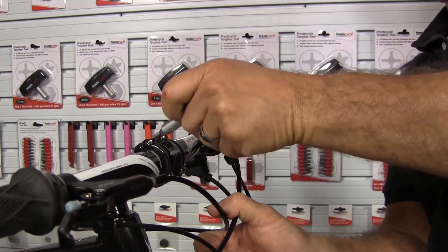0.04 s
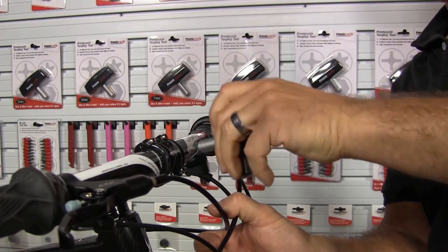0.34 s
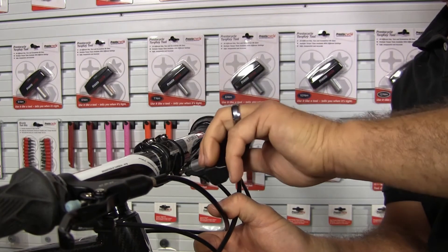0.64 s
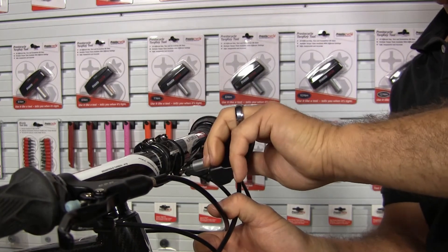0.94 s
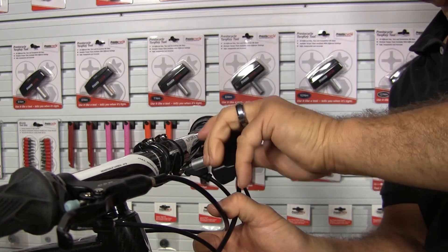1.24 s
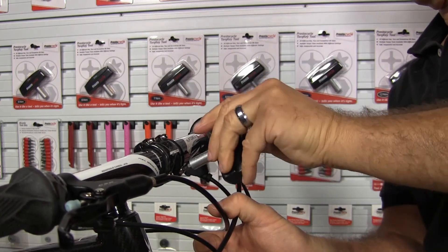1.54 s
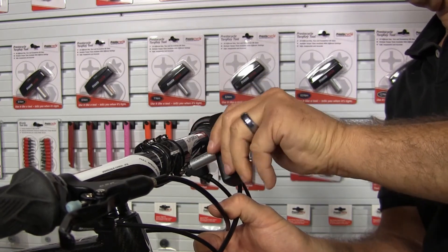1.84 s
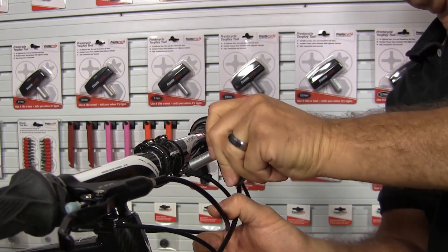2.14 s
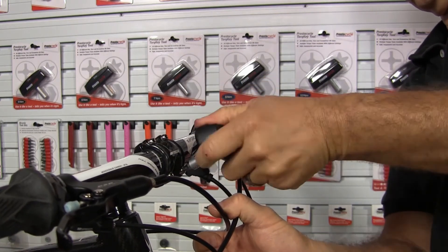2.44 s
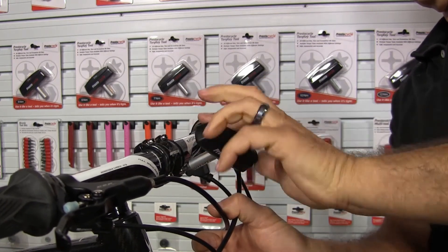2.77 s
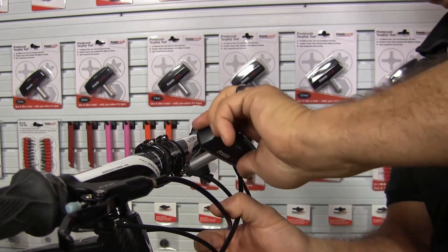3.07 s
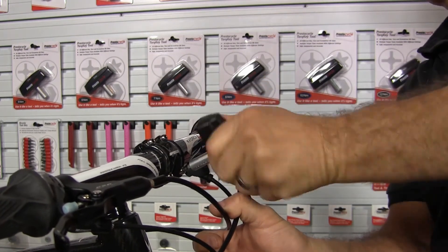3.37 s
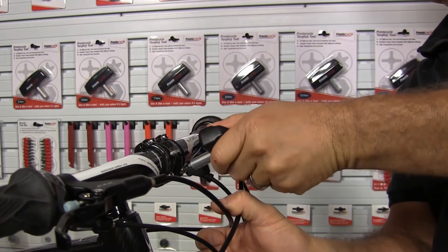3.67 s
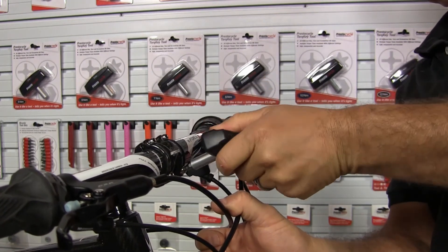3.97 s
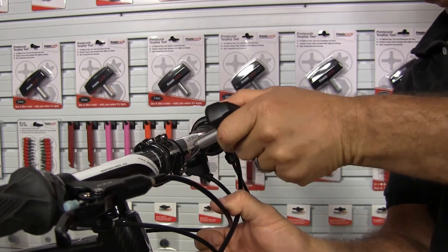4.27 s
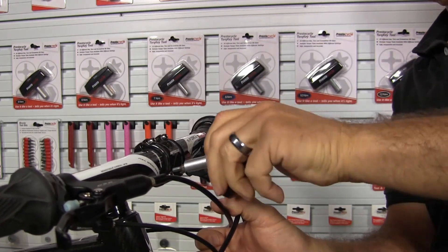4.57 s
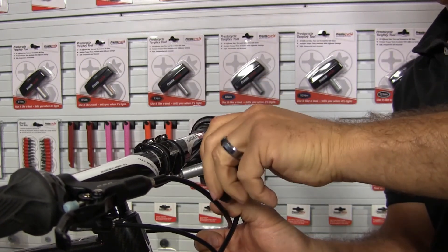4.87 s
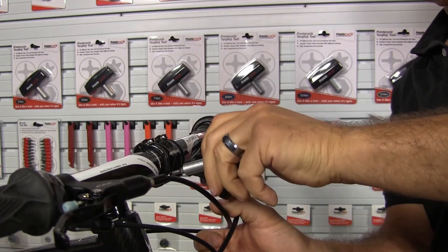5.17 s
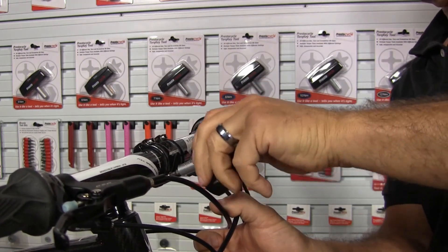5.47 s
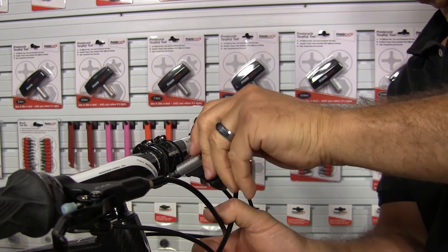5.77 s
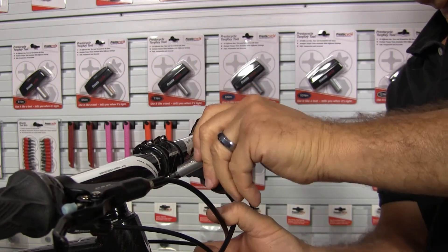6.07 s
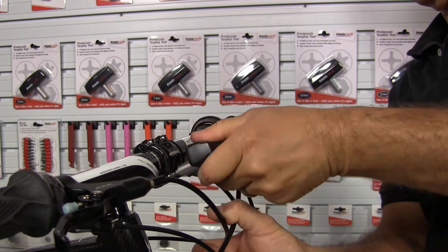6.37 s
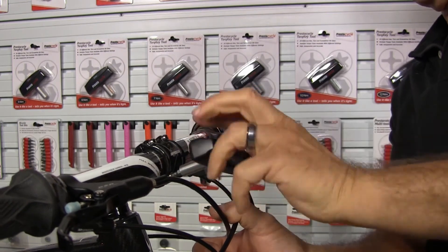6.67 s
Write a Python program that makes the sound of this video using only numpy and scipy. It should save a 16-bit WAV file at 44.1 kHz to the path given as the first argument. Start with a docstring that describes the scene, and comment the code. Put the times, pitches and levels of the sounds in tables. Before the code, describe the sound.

Close, irregular metallic clicks and knocks sound in a quiet little workshop as screws on a bicycle handlebar are undone. The steel bit scrapes into a screw head, and two screws let go with short ringing snaps, the second the loudest. Softer ticks and a faint rub of skin on plastic follow, then clusters of bright clicks and several lighter knocks. A soft hiss and low rumble lie underneath.

```python
"""Screws on a bicycle handlebar let go under a small T-handle torque tool, each snap ringing the bar.
The steel bit clicks and scrapes in the screw heads; the hand rubs over the handle and the grip
squeaks faintly. A small, quiet workshop answers with a short tail over low rumble and steady hiss."""
import sys
import numpy as np
from scipy import signal
from scipy.fft import rfft, irfft, next_fast_len
from scipy.io import wavfile
from scipy.ndimage import uniform_filter1d

SR = 44100
rng = np.random.default_rng(int(sys.argv[2]) if len(sys.argv) > 2 else 0)


def wav_out(sig):
    """Save sig, one row per channel (or a flat mono array), as 16-bit PCM at SR to the path in sys.argv[1]."""
    wavfile.write(sys.argv[1], SR, np.round(np.clip(np.atleast_2d(sig).T, -1, 1) * 32767).astype(np.int16))


N = 300762


def amp(db):
    """Decibels to gain."""
    return 10 ** (np.asarray(db) / 20)


def unit(x):
    """Scale to rms 1."""
    return x / np.sqrt(np.mean(x ** 2) + 1e-20)


def along(points, hz):
    """Interpolate (freq_hz, value) points on a log axis."""
    freqs_hz, values = np.transpose(points)
    return np.interp(np.log(hz + 1), np.log(freqs_hz + 1), values)


def filtered(x, response):
    """Apply a frequency response."""
    n = x.shape[-1]
    size = next_fast_len(n + SR // 4)
    return irfft(rfft(x, size) * response(np.fft.rfftfreq(size, 1 / SR)), size)[..., :n]


def convolved(x, response):
    """Apply an impulse response, keeping the length of x."""
    return signal.fftconvolve(np.atleast_2d(x), np.atleast_2d(response), axes=1)[:, :x.shape[-1]]


def coloured(x, points, size=4096):
    """Minimum-phase filter from (freq_hz, gain_db) points; attacks stay sharp."""
    cepstrum = irfft(np.log(amp(along(points, np.fft.rfftfreq(size, 1 / SR)))))
    cepstrum[1:size // 2] *= 2
    cepstrum[size // 2 + 1:] = 0
    return convolved(x, irfft(np.exp(rfft(cepstrum))))


def add(track, start_s, sound):
    """Mix a stereo sound into the track."""
    part = track[:, round(start_s * SR):][:, :sound.shape[1]]
    part += sound[:, :part.shape[1]]


def held(start_s, end_s, attack_s, release_s):
    """Envelope: 1 from start_s to end_s, exponential flanks outside."""
    t = np.arange(N) / SR
    return np.exp(np.minimum(t - start_s, 0) / attack_s - np.maximum(t - end_s, 0) / release_s)


def wander(rate_hz):
    """Random drift of rms 1: noise averaged over 1 / rate_hz."""
    return unit(uniform_filter1d(rng.standard_normal(N), SR // rate_hz))


def noise_pair(correlation, size):
    """Stereo white noise; correlation is a function of frequency."""
    mid, side = rng.standard_normal((2, size))
    side = filtered(side, lambda hz: np.sqrt((1 - np.clip(correlation(hz), 0, 1)) / 2))
    mid = filtered(mid, lambda hz: np.sqrt((1 + np.clip(correlation(hz), 0, 1)) / 2))
    return np.array([mid + side, mid - side])


def echoes(decay, correlation, rise_s):
    """Dense stereo echoes, energy 1 per channel; decay lists (freq_hz, t60_s)."""
    hz, t, spectra = signal.stft(noise_pair(lambda hz: correlation, SR // 2), SR, nperseg=128)
    spectra = spectra * amp(-60 * t / along(decay, hz)[:, None])
    tail = signal.istft(spectra, SR, nperseg=128)[1][:, :SR // 2]
    tail *= 1 - np.exp(-(np.arange(tail.shape[1]) / SR / rise_s) ** 2)
    return tail / np.sqrt(np.sum(tail ** 2) / 2)


# background spectrum: freq_hz, gain_db
AIR_SPECTRUM = [(12, -20), (20, -2), (55, -5), (137, -7.5), (186, -10.5), (268, -12), (385, -14.5),
                (455, -14), (618, -16), (1550, -20.5), (1990, -20.5), (2290, -21), (3290, -21.5),
                (15700, -26)]
# background left-right likeness: freq_hz, correlation
AIR_CORRELATION = [(30, 0.85), (250, 0.58), (1000, 0.24), (4000, 0.067), (12000, 0.03)]


def workshop_air(level_db=-59):
    """Low building rumble and even hiss."""
    noise = noise_pair(lambda hz: along(AIR_CORRELATION, hz), N)
    return amp(level_db) * unit(filtered(noise, lambda hz: amp(along(AIR_SPECTRUM, hz))))


# room reverberation: freq_hz, t60_s
ROOM_DECAY = [(200, 0.82), (800, 0.31), (1500, 0.37), (2700, 0.29), (5000, 0.27), (9000, 0.33),
              (14000, 0.083)]


def in_room(x, room_db):
    """Direct sound plus the room's tail."""
    tail = echoes(ROOM_DECAY, correlation=0.77, rise_s=0.004)
    return x + amp(room_db) * convolved(np.atleast_2d(x).mean(axis=0), tail)


# squeaks of the shifting grip: start_s, length_s, first_hz, last_hz, level_db
GRIP_SQUEAKS = [(2.89, .34, 8350, 10600, -72), (3.29, .13, 9050, 9350, -73)]


def grip_squeaks(swell_db=16, fade_s=0.02):
    """Unsteady friction whistles: each glides up and swells with pressure until the grip lets go."""
    track, t = np.zeros(N), np.arange(N) / SR
    waver, grip = wander(rate_hz=500), wander(rate_hz=70)
    for start_s, length_s, first_hz, last_hz, level_db in GRIP_SQUEAKS:
        to_go = np.clip(1 - (t - start_s) / length_s, 0, 1)
        pitch_hz = last_hz + (first_hz - last_hz) * to_go ** 1.7
        phase = 2 * np.pi * np.cumsum(pitch_hz * (1 + 0.008 * waver)) / SR
        gain = amp(level_db - swell_db * to_go + 3 * grip)
        track += np.sin(phase) * gain * held(start_s, start_s + length_s, fade_s, fade_s)
    return in_room(track, room_db=1)


def contact(size=128):
    """Two surfaces meet: 1-2 ms of chatter with a flat spectrum."""
    ramp = np.arange(size) / size
    spectrum = rfft(rng.standard_normal(size) * ramp * np.exp(-ramp * 2 * np.pi))
    return irfft(spectrum / np.abs(spectrum))


def friction(size, spread_db):
    """Tiny slips of uneven size, one per millisecond."""
    noise = rng.standard_normal(size)
    slip_db = spread_db * np.repeat(rng.standard_normal(size), SR // 1000)[:size]
    return unit(noise * amp(slip_db))


# skin rubbing on plastic: freq_hz, gain_db
SKIN_SPECTRUM = [(200, -9.5), (1000, 1.5), (3000, 1.5), (6000, -6), (11000, -12), (15000, -24)]


def hand_rub(stroke_db=-63.5, pressure_db=3.5, slip_db=-54.5, catches_per_s=90):
    """Skin rasps and catches on the handle: one stroke at uneven pressure, with one slip of the grip."""
    stroke = amp(stroke_db + pressure_db * wander(rate_hz=70))
    stroke *= held(start_s=3.305, end_s=3.55, attack_s=0.023, release_s=0.03)
    slip = amp(slip_db) * held(start_s=3.457, end_s=3.457, attack_s=0.0057, release_s=0.021)
    catches = (rng.random(N) < catches_per_s / SR) * rng.uniform(0.4, 1, N)
    rasp = friction(N, spread_db=4.5) + amp(-5) * unit(convolved(catches, contact()))
    return in_room(unit(coloured(rasp, SKIN_SPECTRUM)) * (stroke + slip), room_db=-4)


# steel sliding on steel: freq_hz, gain_db
STEEL_SPECTRUM = [(200, 0), (900, -18), (1600, -8), (4000, 2), (9500, -0.5), (12500, -10), (15000, -20)]
# slides of the bit: centre_s, half_width_s, level_db, ring_hz, ring_db
BIT_SCRAPES = [(0.113, 0.012, -42.5, 8400, -13), (0.123, 0.013, -46, 8500, 9),
               (0.739, 0.0042, -46, 5830, 3), (4.245, 0.0068, -40.5, 2830, -7),
               (4.26, 0.0072, -50, 8250, 8), (4.27, 0.015, -50, 1570, 3), (5.327, .007, -50, 3600, 12),
               (6.379, 0.074, -62.5, 10500, -4)]


def bit_scrapes():
    """The bit slides along the socket wall and excites one resonance."""
    track, t = np.zeros((2, N)), np.arange(SR // 2) / SR
    for centre_s, half_width_s, level_db, ring_hz, ring_db in BIT_SCRAPES:
        slips = friction(len(t), spread_db=-1.5)
        ring = filtered(slips, lambda hz: 1 / (1 + 1j * 12 * (hz - ring_hz) / ring_hz) ** 2)
        slide = unit(unit(coloured(slips, STEEL_SPECTRUM)) + amp(ring_db) * unit(ring))
        stroke = np.exp(-(t / half_width_s - 2) ** 2)
        add(track, centre_s - 2 * half_width_s, amp(level_db - 3) * in_room(slide * stroke, room_db=-6))
    return track


def struck(modes, ring_t60_s, ring_db, clatter_t60_s, clatter_db):
    """Struck metal: contact, ring of clear modes and clatter of many damped ones, new at every blow."""
    t = np.arange(SR // 2) / SR
    mode_hz, mode_db = np.transpose(modes)[:, :, None]
    strength = amp(mode_db + 1.84 * rng.standard_normal(mode_hz.shape))
    partials = strength * np.sin(2 * np.pi * (mode_hz * t + rng.random(mode_hz.shape)))
    ring = partials.sum(axis=0) * amp(-60 * t / ring_t60_s)
    ring *= amp(ring_db) / np.linalg.norm(ring)
    clatter = amp(clatter_db) * echoes([(1000, clatter_t60_s)], correlation=0.75, rise_s=0.0029)
    return convolved(signal.unit_impulse(len(t)) + ring + clatter, contact())


def focused(x, focus_hz, q, band_db):
    """Place and length of a contact favour one band, added to x at band_db."""
    def response(hz):
        damping = 1j * hz * focus_hz / q
        return 1 + amp(band_db) * damping / (focus_hz ** 2 - hz ** 2 + damping)
    return filtered(x, response)


# steel bit modes: freq_hz, level_db
BIT_MODES = [(1560, -9), (2030, 5.5), (3000, -3), (4455, 3), (5130, 9), (6050, 1), (7520, 1), (8300, -4),
             (8860, 6), (11200, -7)]
# clicks in a screw head: start_s, level_db, edge_db, focus_hz
BIT_CLICKS = [(0.745,-45,-3,5700), (1.03,-46,-22,3300), (1.073,-51.5,-15,6140), (1.187,-45,-5,4500),
              (1.192,-39,-4,3580), (2.160,-52.5,-2,5440), (2.621,-60,-4,2460), (3.372,-58,-14,3000),
              (3.454,-48,-2,3420), (3.553,-59,-14,2700), (4.158,-37.5,0.5,7340), (4.2241,-38.5,-5.5,7540),
              (4.2391,-37.5,-8,6200), (4.2456,-43.5,-1,4800), (5.343,-47,-19,4640), (5.7584,-50.5,-22,2930),
              (5.786,-48.5,-8,2830), (5.8651,-37.5,-2,3550), (5.868,-39,-8,3600), (6.3267,-48,-4,2560)]


def bit_clicks(body_db_per_octave=-10):
    """The bit drops into a screw head or taps its rim: a bright tick, thinner the higher its focus."""
    track = np.zeros((2, N))
    for start_s, level_db, edge_db, focus_hz in BIT_CLICKS:
        body_db = 1 + body_db_per_octave * np.log2(focus_hz / 3600)
        spectrum = [(150, body_db - 17), (600, body_db), (1400, body_db + 7), (3300, -3), (5000, -6),
                    (6500, -3), (9000, edge_db), (11800, edge_db - 0.5), (14500, edge_db - 24)]
        tick = struck(BIT_MODES, ring_t60_s=0.085, ring_db=-9.5, clatter_t60_s=0.055, clatter_db=2.5)
        tick = focused(coloured(tick, spectrum), focus_hz, q=5.1, band_db=7)
        add(track, start_s, amp(level_db + 19.5) * in_room(tick, room_db=-5))
    return track


# handlebar and clamp modes: freq_hz, level_db
BAR_MODES = [(250, -1.5), (375, -1), (425, 4.5), (640, 3), (828, -0.5), (875, -13.5), (940, 2), (1022, -12),
             (1190, -2), (1260, 1.5), (1296, -4), (1396, -19), (1446, -13), (1555, -2), (1608, -12),
             (1772, -16), (1836, 1), (1940, -20), (2135, -2), (2235, 0.5), (2446, -8.5), (2614, -18),
             (2813, -12), (2968, -29), (3028, 0), (3140, -16), (3500, -1), (5480, 2), (8850, 2),
             (11200, 8.5)]
# knocks through the bar: start_s, level_db, hardness_db, crack_db, focus_hz
SCREW_KNOCKS = [(0.037,-40,-11.5,-13.5,1220), (0.706,-24,-3,-20,1060), (0.9888,-40.5,-9.5,-17,1240),
                (1.085,-42.5,-16,-16,1330), (1.441,-52,-9,-15,1500), (1.4874,-19.5,-3.5,-15,1620),
                (1.802,-50.5,-8,-17,1550), (1.8243,-47.5,-9,-21,1750), (2.172,-51.5,-9,-12,1790),
                (2.6736,-46.5,-9,-17,1010), (3.046,-58,-7,-19,1200), (3.662,-42.5,-13.5,-29,1245),
                (4.135,-53.5,-2,-15,1300), (4.960,-37.5,-6,-20,950), (5.293,-31,-4.5,-19.5,950),
                (5.3606,-42,-9,-21,970), (5.676,-53,-25,-20,930), (6.5799,-42,-5.5,-16.5,1450),
                (6.612,-44,-12,-10,990)]


def screw_knocks(light_knock_db=-40, thud_loss_db_per_db=0.73):
    """A screw lets go or the tool takes up its play: the bar rings, brighter the harder the contact."""
    track = np.zeros((2, N))
    for start_s, level_db, hardness_db, crack_db, focus_hz in SCREW_KNOCKS:
        # more force, shorter contact, smaller share of low thud
        thud_db = -8.5 - thud_loss_db_per_db * max(level_db - light_knock_db, 0)
        spectrum = [(110, thud_db - 27), (250, thud_db + 0.5), (560, thud_db),
                    (740, -10.5), (950, -1), (1700, -4), (2350, hardness_db), (3300, hardness_db - 3),
                    (4300, crack_db - 5), (11300, crack_db - 9), (14000, crack_db - 33)]
        blow = struck(BAR_MODES, ring_t60_s=0.075, ring_db=-3.5, clatter_t60_s=0.1, clatter_db=0)
        blow = focused(coloured(blow, spectrum), focus_hz, q=10.5, band_db=0.5)
        add(track, start_s, amp(level_db + 31.5) * in_room(blow, room_db=-8))
    return track


def scene():
    """The tool slightly left of centre, over the workshop's background."""
    tool = screw_knocks() + bit_clicks() + bit_scrapes() + hand_rub() + grip_squeaks()
    pan_db = [[0.5], [-0.5]]
    return tool * amp(pan_db) + workshop_air()


def record(dry):
    """Brick-wall low-pass."""
    cutoff_hz = 15780
    return filtered(dry, lambda hz: hz < cutoff_hz)


dry = scene()
out = record(dry)
wav_out(out)
```